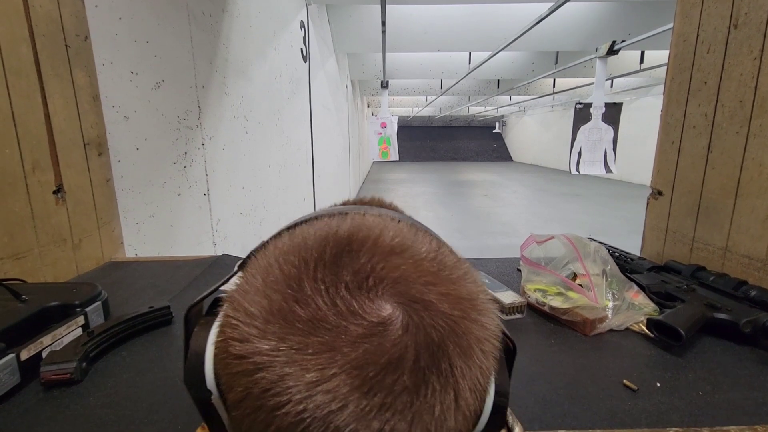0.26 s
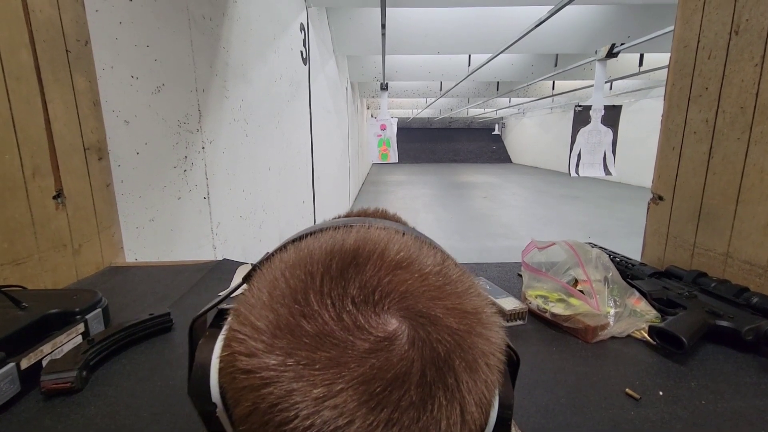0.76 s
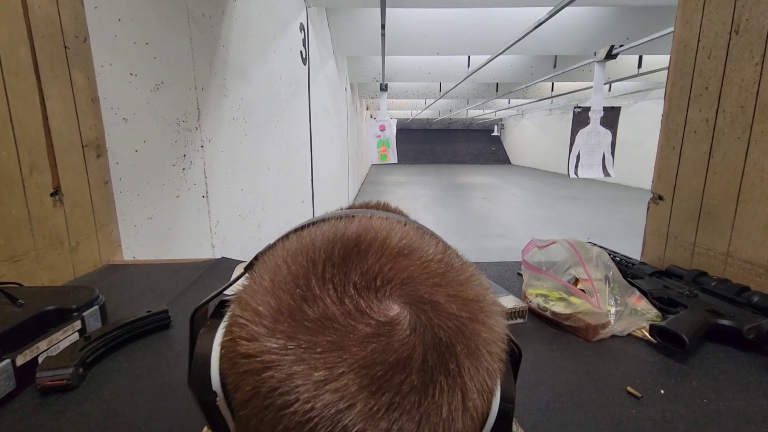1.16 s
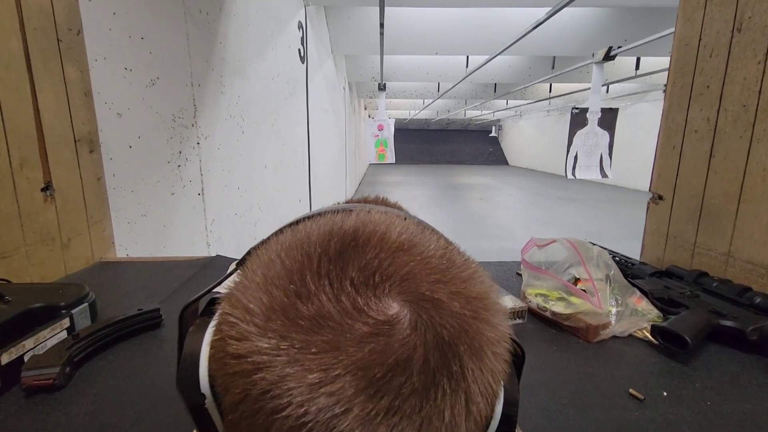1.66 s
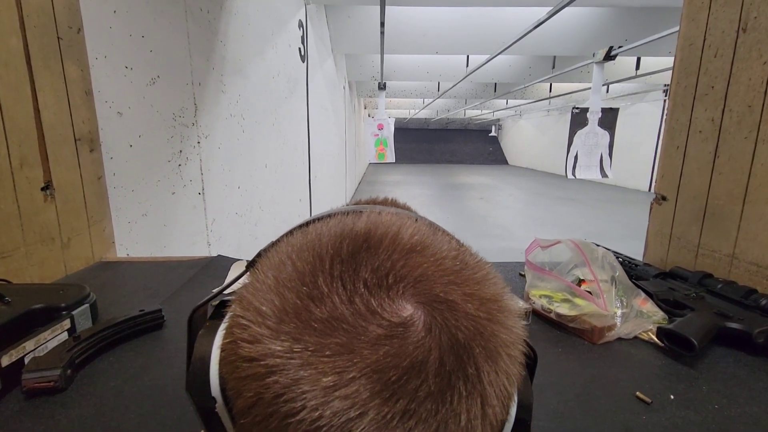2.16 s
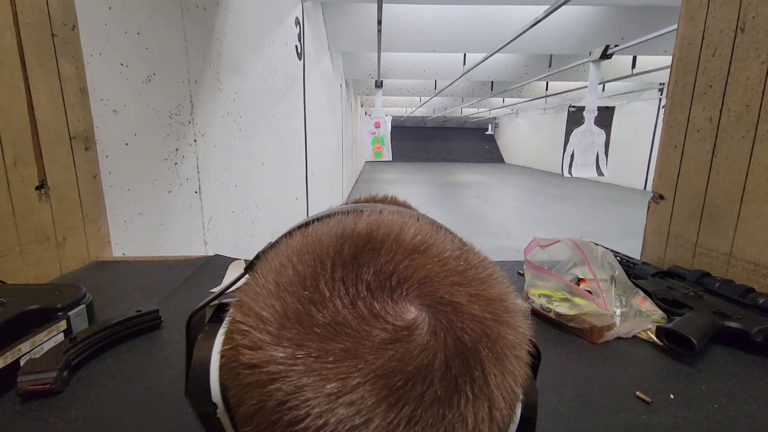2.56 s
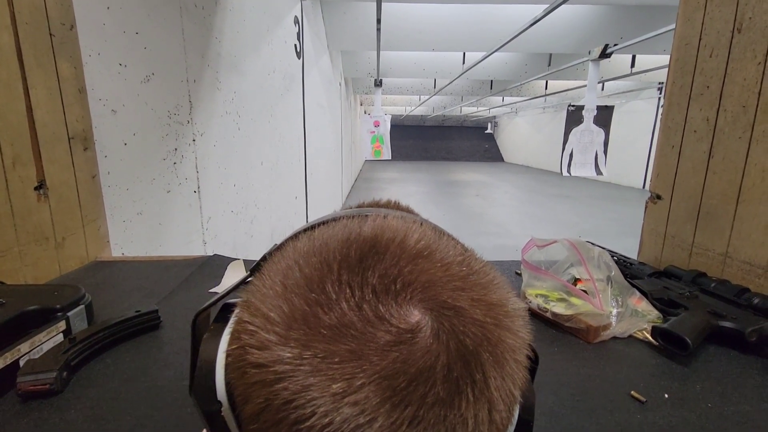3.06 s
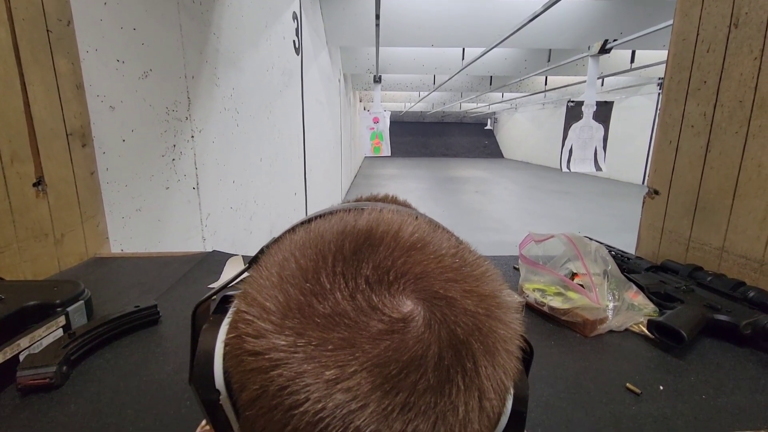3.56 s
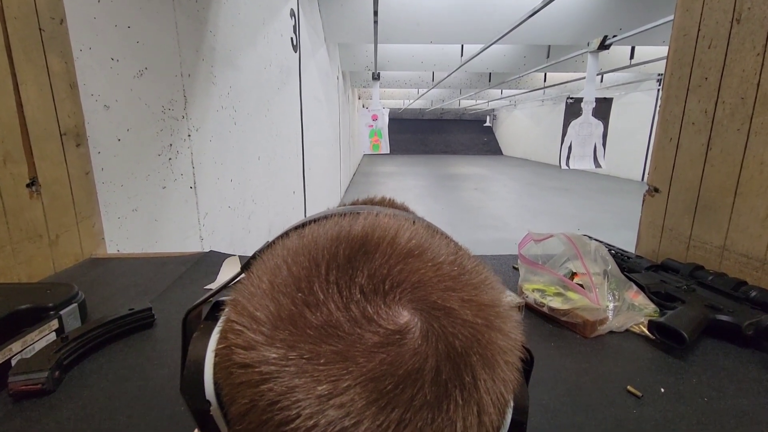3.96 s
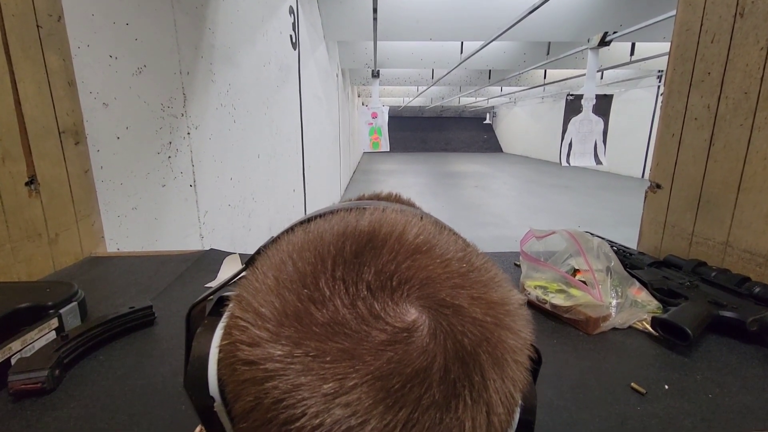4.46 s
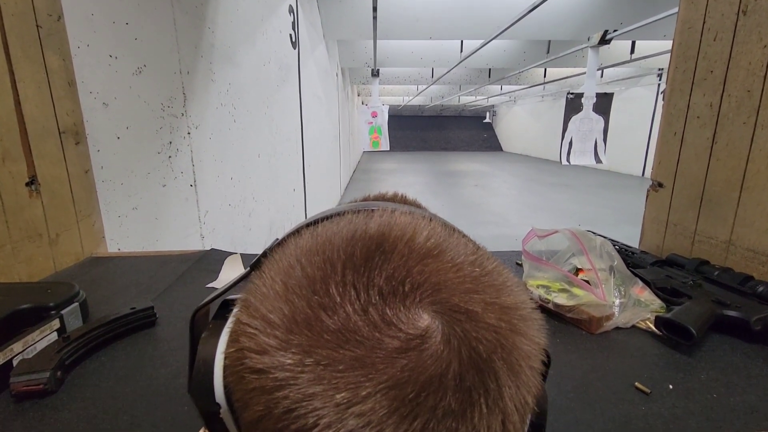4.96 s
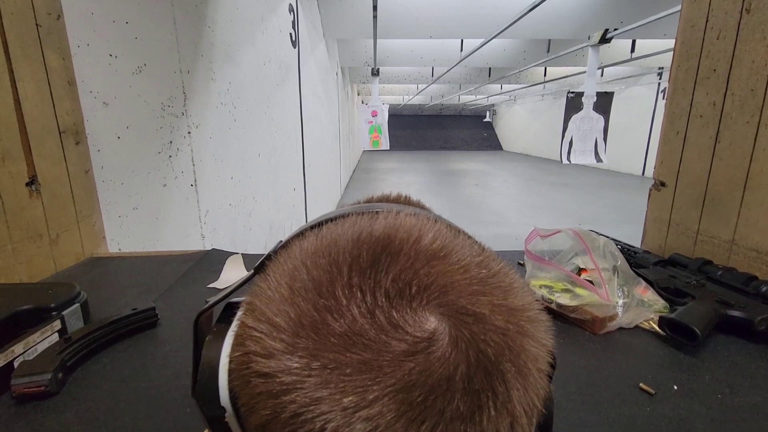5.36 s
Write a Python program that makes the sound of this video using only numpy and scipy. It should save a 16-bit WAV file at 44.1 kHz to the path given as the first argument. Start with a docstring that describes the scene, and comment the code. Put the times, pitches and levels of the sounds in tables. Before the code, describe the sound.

A gunshot's echo dies away in a concrete indoor range, then three more loud blasts boom and ring over steady ventilation hum, with cases tinkling.

```python
"""Concrete indoor range: gunshots from a neighbouring lane, the first already dying away.
Each blast is a dull lead-in, a crack, a bright roar of filtered noise, a long ringing flutter echo and
a boom of beating standing waves. Spent cases tinkle on the floor: decaying sines plus noise bursts.
Ventilation is shaped noise with steady hum lines. A limiter holds the blasts down."""
import sys
import numpy as np
from scipy import signal
from scipy.fft import rfft, irfft, next_fast_len
from scipy.io import wavfile
from scipy.ndimage import uniform_filter1d, map_coordinates

SR = 44100
rng = np.random.default_rng(int(sys.argv[2]) if len(sys.argv) > 2 else 0)


def store_pcm(level_fs):
    """Save levels as 16-bit WAV."""
    pcm = np.round(np.clip(level_fs, -1, 1) * 32767).astype(np.int16)
    wavfile.write(sys.argv[1], SR, np.atleast_2d(pcm).T)


N = 247533

# Levels in the tables are relative; "band level" is per octave band.
# shots: t/s, blast/dB, brightness/(dB per octave), boom/dB, linger/dB, dull lead-in/dB, crack/dB
SHOTS = [(-0.363, 2, 3, -8.5, -3.5, 6, -14), (2.6407, 5, 2.0, 3.5, 1.27, 0, -19.5),
         (4.295, 5, 2.17, -0.5, -2, -2.5, -13), (4.654, 0.53, 2.1, -2, -2, -14.5, -5)]
# dull lead-in of a blast: f/Hz, band level/dB
FRONT_BANDS = [(30, -33.5), (70, -17), (130, -25.5), (300, -28), (600, -16), (1100, -18.5), (2000, -19.5),
               (4500, -20.5), (8000, -27.5), (16000, -27)]
# tonal peaks in the lead-in: f/Hz, width/Hz, level/dB
FRONT_PEAKS = [(510, 67, 15), (810, 18, 20.5), (1190, 160, 3.5), (1386, 180, 12), (2300, 240, 6),
               (5180, 320, 9)]
# first bright reflections: f/Hz, band level/dB
CRACK_BANDS = [(200, -29.5), (1000, -31.5), (3500, -9.5), (7000, -15), (10500, -14), (13000, -12),
               (15500, 0), (17000, -15)]
# roar that fills the hall: f/Hz, band level/dB
ROAR_BANDS = [(28, -31.5), (70.5, -17), (120, -19), (157, -16.5), (213.6, -17.5), (301, -10), (400, -7.5),
              (553, -8.5), (1150, -7), (2180, -14), (4640, -15.5), (7600, -14.5), (11000, -17),
              (13000, -10.5), (15500, -14.5), (17000, -23)]
# slow echo along the lanes: f/Hz, band level/dB
LINGER_BANDS = [(100, -60.5), (282, -52), (560, -34), (780, -32), (1180, -29), (2080, -34), (2950, -31.5),
                (4540, -31), (7600, -31.5), (11150, -33.5), (16000, -42)]
# broad and narrow peaks in the tone of the echoes: f/Hz, width/Hz, level/dB
ECHO_PEAKS = [(152, 26, 6), (282, 48, 4), (361, 19, 3.5), (484, 33, -2), (549, 98, 3.5), (710, 81, 0.5),
              (710, 24, 3), (1060, 300, -0.5), (1284, 89, 3), (1820, 130, 3), (2940, 600, 1.5)]
# flutter between the parallel side walls: f/Hz, share repeated per round trip (before scaling)/1
FLUTTER_SHARE = [(200, .1), (500, 0.26), (1000, .62), (2200, .62), (4000, .38), (7000, .05)]
# standing waves of the hall: f/Hz, level/dB, t60/s, side of the node/+-1
STANDING_WAVES = [(42.9, -27, 2.3, 1), (61.4, -14.5, 2.7, -1), (76.96, -9.5, 3.13, 1),
                  (87.82, -10.5, 2.67, 1)]
# strongest modes between the side walls: f/Hz, level/dB, t60/s
WALL_MODES = [(282.2, -26, 1.5), (365.6, -32, 1.8), (395, -38, 3.04), (541, -38.5, 4.7), (564, -37.5, 4.35),
              (627, -39.5, 6.1), (723, -45.5, 5.6), (805, -38.5, 5.9), (952.8, -37, 3.6), (1090, -45, 5.8),
              (1335, -46.5, 7.1), (1373, -43.5, 5)]
# cases and small metal parts landing: t/s, ring/dB, tick/dB, clatter/dB, rise/s, tick t60/s
DROPS = [(1.183, -85.5, -80, -62, 0.0064, .2), (3.375, -55.5, -71.5, -66, 0.014, 0.12),
         (5.385, -37.5, -37, -64, 0.0048, 0.19), (5.497, -40, -39, -44.5, 0.0052, 0.58),
         (5.522, -39.5, -36, -47, 0.0012, 0.018)]
# ring of a brass case: f/Hz, level/dB, t60/s
BRASS_MODES = [(5470, -12, 0.25), (6000, -2, 0.09), (12330, -6.5, .42), (12440, 2, 0.18), (12570, -12, .08)]
# tick of an impact: f/Hz, band level/dB
TICK_BANDS = [(3000, -25), (5000, -4), (6000, -12), (8500, -10), (10500, -11), (13500, -2), (16000, -20)]
# clatter of an impact: f/Hz, band level/dB
CLATTER_BANDS = [(400, -30), (1400, -9), (2700, 5), (4800, -4.5), (9000, -11), (16000, -8)]
# rushing air and hiss: f/Hz, band level/dB
AIR_BANDS = [(15, -51), (28, -70), (42, -46.5), (75, -45), (130, -55), (220, -62.5), (400, -60),
             (600, -61.5), (1000, -63), (2200, -65.5), (4800, -71.5), (7500, -82.5), (11000, -85),
             (13300, -68.5), (14700, -69.5), (16000, -81)]
# steady hum lines: f/Hz, rms level/dB
HUM_LINES = [(17.8, -56), (60.5, -65.5), (75.4, -57.5), (150.7, -61), (532.9, -66.5), (627, -67.5)]
# two microphones: f/Hz, left-right likeness/1, left minus right/dB
MIC_PAIR = [(30, 0.94, 1.5), (70, 0.962, 1.5), (151, 0.8, -1.5), (312, 1, -0.8), (685, -0.49, -2.5),
            (1240, -0.74, -1), (2430, -0.05, -5), (4360, -0.24, -6.5), (8200, 0.75, -1.4),
            (14800, 0.41, 0.5)]

ROUND_TRIP_S = 0.04525  # between the side walls
ROAR_T60_S, BASS_HOLD = 0.92, 0.12  # wall decay at 1 kHz; power by which it lengthens towards the bass
BUILD_S, BUILD_KNEE_HZ = 0.065, 90  # time constant of filling the hall; shorter below the knee
RETURN_S, RETURN_DB = 0.12, -12  # roar coming back from the far end of the lanes
AIR_T60_S, AIR_POWER = 1, 1.22  # air absorption at 10 kHz; its power of frequency
LINGER_T60_S, LINGER_BUILD_S = 5.36, 0.037  # decay without air absorption; build-up time constant
BAND_LIMIT_HZ = 15800


def amp(db):
    """Decibels to gain."""
    return 10 ** (np.asarray(db) / 20)


def along(table, hz, column=1):
    """One table column, interpolated on a log-frequency axis."""
    columns = np.transpose(table)
    return np.interp(np.log(hz + 1), np.log(columns[0] + 1), columns[column])


def since(start_s):
    """Seconds since start_s, for every sample."""
    return np.arange(N) / SR - start_s


def fade(t_s, t60_s):
    """Silence before zero, then an exponential decay of 60 dB per t60_s."""
    return (t_s >= 0) * np.exp(-np.log(1000) * np.maximum(t_s, 0) / t60_s)


def wobble(knots_per_s):
    """Smooth random curve through normally distributed knots, mirrored when they run out."""
    coarse = np.arange(0, N + 64, 64)
    knots = rng.standard_normal(256)
    curve = map_coordinates(knots, [coarse * knots_per_s / SR], mode="mirror")
    return np.interp(np.arange(N), coarse, curve)


def diffuse(bands, tilt_db=0, peaks=(), alike=1, flutter=0):
    """Noise from all sides at two microphones: octave levels, tilt, peaks and flutter comb."""
    m = next_fast_len(N + SR // 8)
    hz = np.fft.rfftfreq(m, 1 / SR)
    noise_a, noise_b = rfft(rng.standard_normal((2, m)))

    # Mixing angle sets the left-right correlation.
    angle = np.arccos(np.clip(alike * along(MIC_PAIR, hz), -1, 1)) / 2
    mid, side = noise_a * np.cos(angle), noise_b * np.sin(angle)
    lean = amp(along(MIC_PAIR, hz, column=2) / 2)

    slope_db = tilt_db * np.log2((hz + 1) / 1000)
    peaks_db = sum(db / (1 + (2 * (hz - centre) / width) ** 2) for centre, width, db in peaks)
    per_hz = np.sqrt(SR / 2 / np.log(2) / np.maximum(hz, 10)) * (hz > 10)  # octave level to density
    colour = amp(along(bands, hz) + slope_db + peaks_db) * per_hz
    if flutter:
        kept = np.clip(flutter * along(FLUTTER_SHARE, hz), 0, 0.9)
        comb = 1 - kept * np.exp(-2j * np.pi * hz * ROUND_TRIP_S)
        colour = colour * np.sqrt(1 - kept ** 2) / comb  # power kept
    pair = np.array([(mid + side) * lean, (mid - side) / lean])
    return irfft(pair * colour, m)[:, :N]


def reverberation(bands, start_s, wall_t60_s, build_s, bass_hold=0, return_db=-60, tilt_db=0,
                  alike=1, flutter=0):
    """Tail that builds up, returns once from the far end and dies on the walls and in the air."""
    noise = diffuse(bands, tilt_db, ECHO_PEAKS, alike, flutter)
    hz, t, cells = signal.stft(noise, SR, nperseg=256)
    hz = np.maximum(hz, hz[1] / 2)[:, None]
    wall_decay_s = wall_t60_s * (1000 / hz) ** bass_hold
    air_decay_s = AIR_T60_S * (10000 / hz) ** AIR_POWER
    rise_s = build_s * hz / (hz + BUILD_KNEE_HZ)

    def swell(age_s):
        """Exponential build-up times wall decay."""
        return (1 - np.exp(-np.maximum(age_s, 0) / rise_s)) * fade(age_s, wall_decay_s)

    age_s = t - start_s
    envelope = np.hypot(swell(age_s), amp(return_db) * swell(age_s - RETURN_S))
    envelope = envelope * fade(age_s, air_decay_s)
    return signal.istft(cells * envelope, SR, nperseg=256)[1][:, :N]


def shots():
    """Each shot sums a dull lead-in, a crack, a roar, a fluttering slow echo and a boom."""
    out = np.zeros((2, N))
    crack_noise = diffuse(CRACK_BANDS)
    for start_s, blast_db, bright_db, boom_db, linger_db, front_db, crack_db in SHOTS:
        out += amp(front_db) * lead_in(start_s)
        out += amp(crack_db) * crack(crack_noise, start_s)
        out += amp(blast_db) * roar(start_s, bright_db)
        out += amp(linger_db) * slow_echo(start_s, bright_db)
        out += amp(boom_db) * boom(start_s)
    return out


def lead_in(start_s, rise_s_per_20db=0.013, lead_s=0.0059, t60_s=0.091):
    """Dull lead-in: noise that swells just before the bright part, then decays."""
    t = since(start_s)
    rise = amp(20 * np.minimum(t + lead_s, 0) / rise_s_per_20db)
    decay = fade(np.maximum(t, 0), t60_s)
    return diffuse(FRONT_BANDS, peaks=FRONT_PEAKS, alike=0.54) * rise * decay


def crack(noise, start_s, t60_s=0.25, rise_s=0.0032, delay_s=0.002):
    """First bright reflections: noise with a fast rise and a short decay."""
    t = np.maximum(since(start_s + delay_s), 0)
    return noise * (1 - np.exp(-t / rise_s)) * fade(t, t60_s)


def roar(start_s, bright_db):
    """Dense reflections fill the hall, and come back from the far end of the lanes."""
    return reverberation(ROAR_BANDS, start_s, ROAR_T60_S, BUILD_S, BASS_HOLD, RETURN_DB,
                         tilt_db=bright_db, alike=0.77)


def slow_echo(start_s, bright_db):
    """Slow echo along the lanes, combed by flutter between the side walls."""
    return reverberation(LINGER_BANDS, start_s, LINGER_T60_S, LINGER_BUILD_S,
                         tilt_db=bright_db, flutter=0.94)


def boom(start_s, build_s=0.42, spread_rad=0.065, lean_db=0.6):
    """Standing waves swell and beat, nearly in phase at the two microphones."""
    t = since(start_s)
    offset_rad = np.array([[spread_rad], [-spread_rad]])
    waves = sum(np.sign(side) * amp(db) * fade(t, t60_s) * np.sin(2 * np.pi * hz * t + offset_rad)
                for hz, db, t60_s, side in STANDING_WAVES)
    build = 1 - fade(t, build_s * np.log(1000))  # build_s is a time constant
    return waves * build * amp([[lean_db], [-lean_db]])


def wall_ring(drift_rad=0.68, waver_db=2.5, neighbour=0.55):
    """Blasts ring the side-wall modes; each beats with its neighbour one round-trip rate below."""
    t, out = since(0), np.zeros((2, N))
    for hz, db, t60_s in WALL_MODES:
        energy = sum((amp(shot[4]) * fade(t - shot[0], t60_s)) ** 2 for shot in SHOTS)
        apart_rad = np.arccos(np.clip(along(MIC_PAIR, hz), -1, 1)) * np.array([[0.5], [-0.5]])
        drift = drift_rad * np.array([wobble(5), wobble(6)])
        phase = 2 * np.pi * (hz * t + rng.random()) + apart_rad + drift
        beat = 2 * np.pi * (t / ROUND_TRIP_S + rng.random())
        level = amp(db + waver_db * wobble(6.5)) * np.sqrt(energy)
        out += level * (np.sin(phase) + neighbour * np.sin(phase - beat))
    return out


def brass_ring(t, pitch_spread=0.004, level_spread_db=2):
    """Modes of one case as decaying complex sines, pitch and levels varied per drop."""
    pitch = 1 + pitch_spread * rng.normal()
    ring = 0
    for hz, db, t60_s in BRASS_MODES:
        cycles = pitch * hz * t + rng.random((2, 1))
        level = amp(db + rng.normal(0, level_spread_db))
        ring = ring + level * fade(t, t60_s) * np.exp(2j * np.pi * cycles)
    return ring


def cases(clatter_t60_s=0.38, shimmer_depth=1.0):
    """Brass rings and shimmers as it lands; tick and clatter are decaying noise."""
    out, tick, clatter = np.zeros((2, N)), diffuse(TICK_BANDS), diffuse(CLATTER_BANDS)
    shimmer = 1 + shimmer_depth * np.array([wobble(150) + 1j * wobble(150) for mic in range(2)])
    shimmer /= np.sqrt(1 + 2 * shimmer_depth ** 2)
    for start_s, ring_db, tick_db, clatter_db, rise_s, tick_t60_s in DROPS:
        first = round(start_s * SR)
        part = slice(first, first + SR // 2)
        t = np.abs(since(start_s)[part])
        hit = amp(ring_db) * (brass_ring(t) * shimmer[:, part]).real
        hit += amp(tick_db) * fade(t, tick_t60_s) * tick[:, part]
        hit += amp(clatter_db) * fade(t, clatter_t60_s) * clatter[:, part]
        out[:, part] += hit * (1 - np.exp(-t / rise_s))
    return out


def ventilation(unsteady_rad=1.0, waver_db=0.4):
    """Rushing air as shaped noise, hum as sines of slightly wavering level and phase."""
    t = since(0)
    hum = np.zeros(N)
    for hz, db in HUM_LINES:
        peak = amp(db + waver_db * wobble(2)) * np.sqrt(2)
        hum += peak * np.sin(2 * np.pi * hz * t + unsteady_rad * wobble(5.8))
    return diffuse(AIR_BANDS) + hum


def scene():
    """Everything heard at the shooting bench."""
    return shots() + wall_ring() + cases() + ventilation()


def limiter(x, ceiling_db=-8.0, release_db_per_s=45):
    """Gain drops fast on a loud sound and recovers at a steady rate in dB."""
    power = np.abs(uniform_filter1d(np.mean(x ** 2, axis=0), size=400))
    over_db = np.maximum(10 * np.log10(power + 1e-12) - ceiling_db, 0)
    ramp_db = release_db_per_s * since(0)
    held_db = np.maximum.accumulate(over_db + ramp_db) - ramp_db
    return x * amp(-uniform_filter1d(held_db, size=130))


def record(dry):
    """Limit the level, round off the peaks and cut everything above the band limit."""
    top, hardness, edge_hz = 0.8, 4, 250
    x = limiter(dry)
    x = x / (1 + np.abs(x / top) ** hardness) ** (1 / hardness)
    m = next_fast_len(N + SR // 8)
    inside = np.clip((BAND_LIMIT_HZ - np.fft.rfftfreq(m, 1 / SR)) / edge_hz + 0.5, 0, 1)
    return irfft(rfft(x, m) * np.sin(np.pi / 2 * inside) ** 2, m)[:, :N]


dry = scene()
out = record(dry)
store_pcm(out)
```